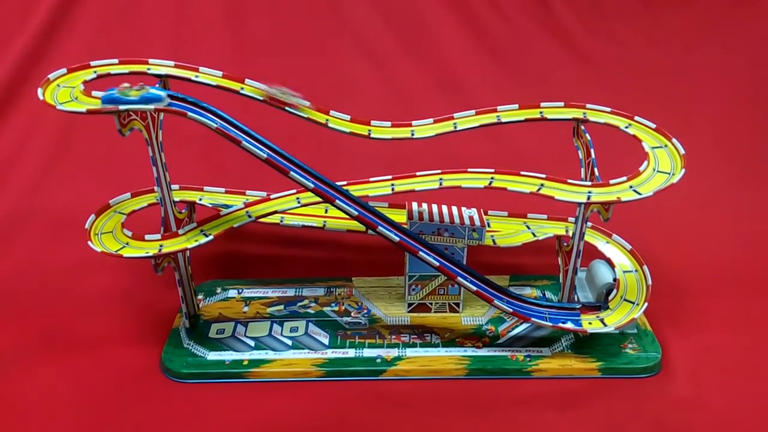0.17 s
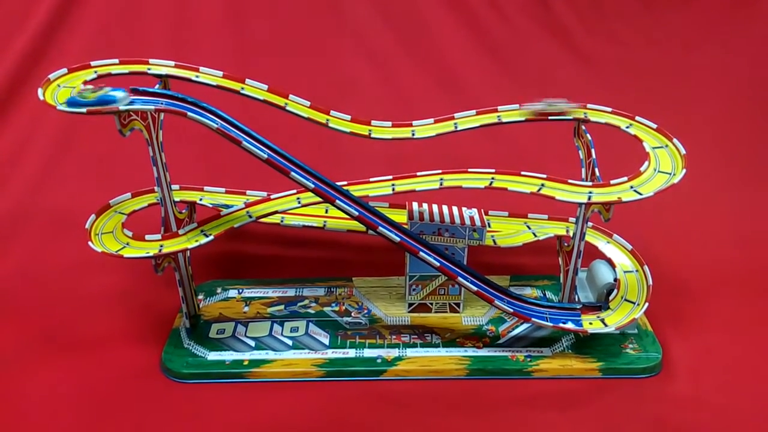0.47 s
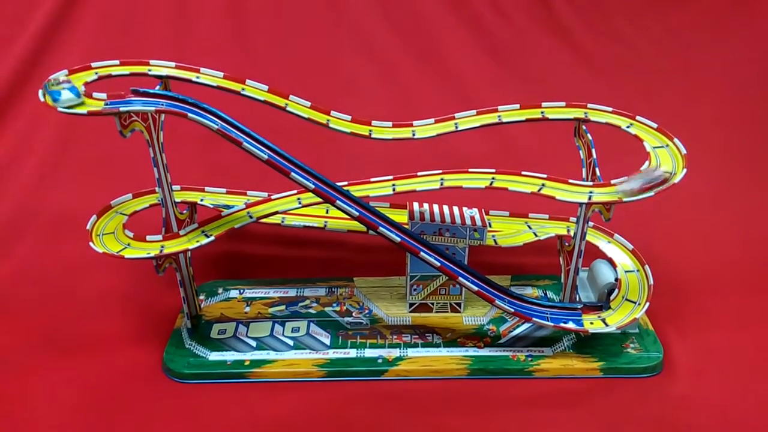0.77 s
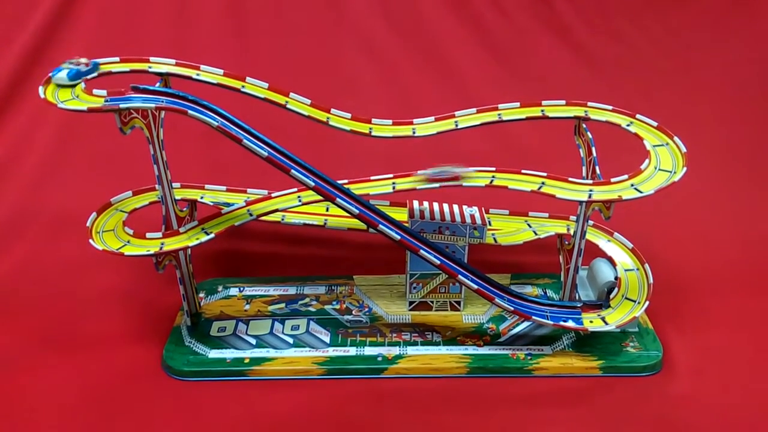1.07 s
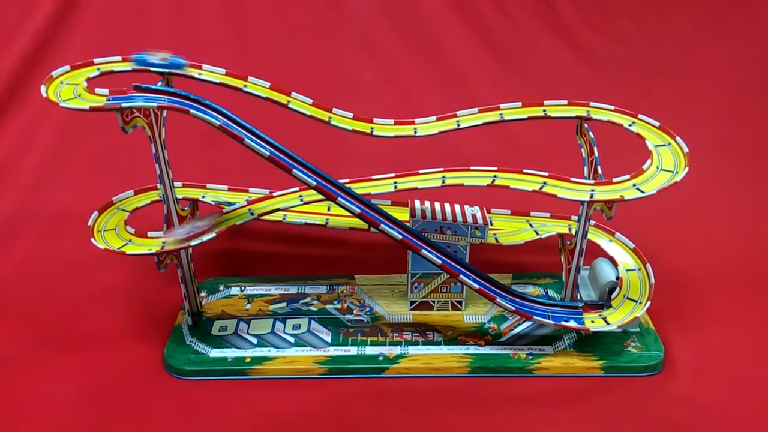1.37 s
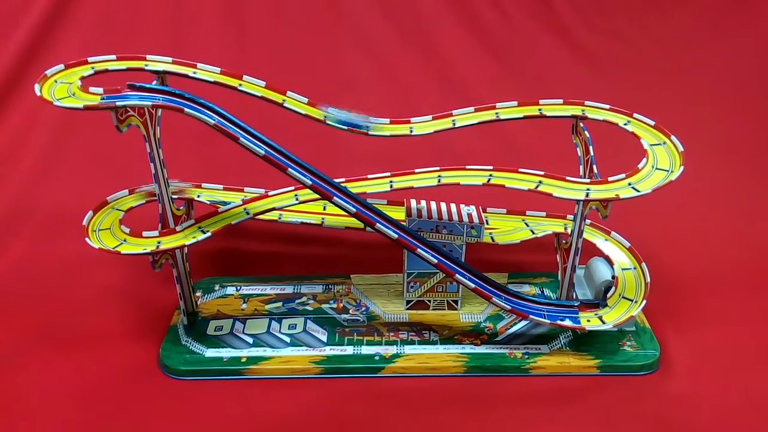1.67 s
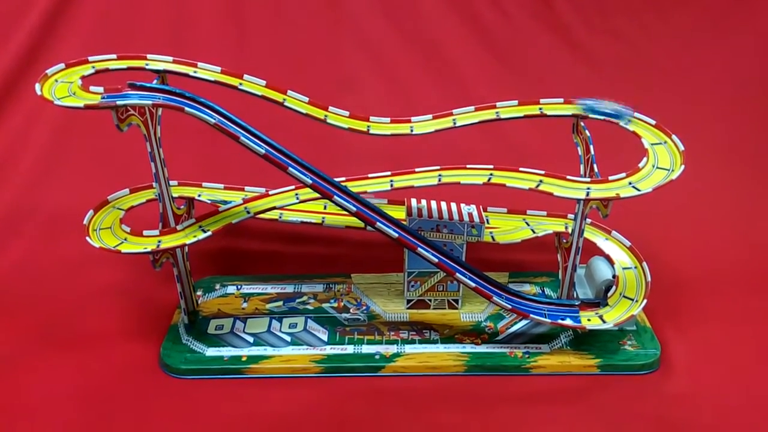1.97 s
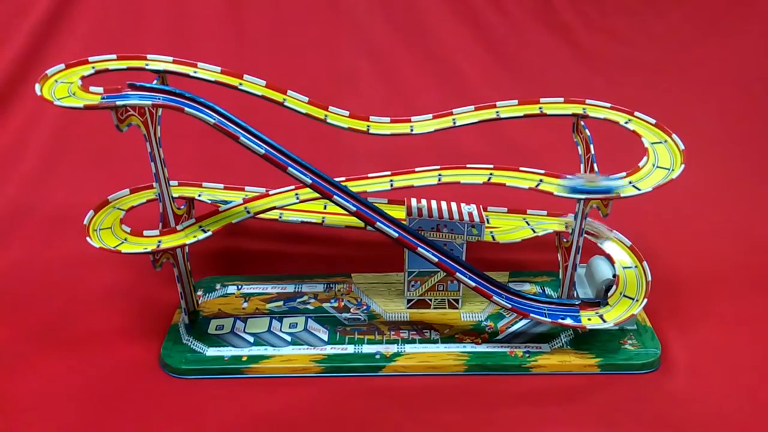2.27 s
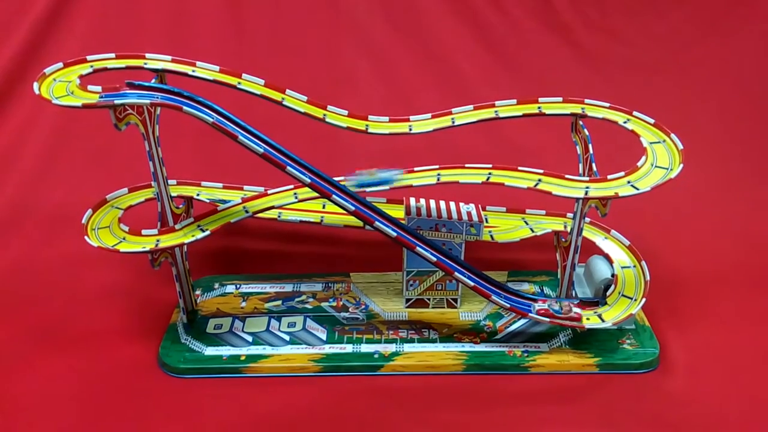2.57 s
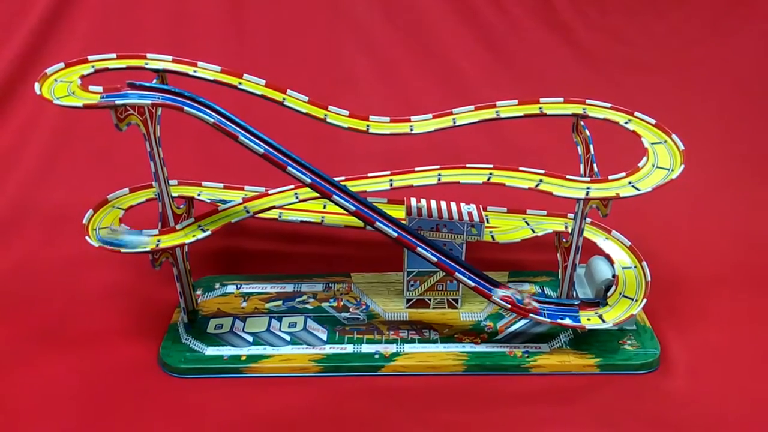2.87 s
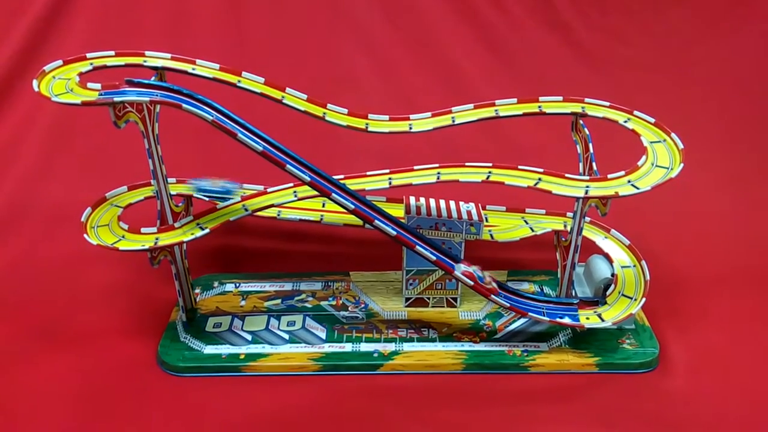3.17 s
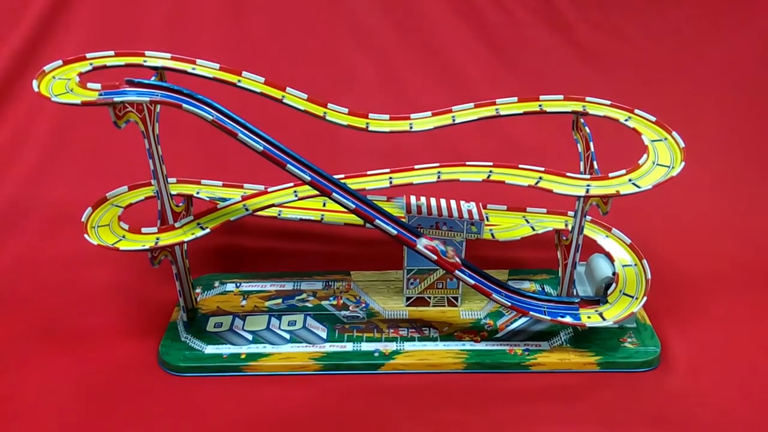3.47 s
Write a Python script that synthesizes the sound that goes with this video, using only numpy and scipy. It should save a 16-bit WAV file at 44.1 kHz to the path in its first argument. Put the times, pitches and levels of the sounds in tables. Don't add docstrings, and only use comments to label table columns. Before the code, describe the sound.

A battery-driven tin roller coaster whirs continuously, its gears chattering fast and bright with a quick flutter, while two small cars rattle over metal track joints; close microphone, quiet room, faint low rumble.

```python
import sys
import numpy as np
from scipy import signal
from scipy.fft import rfft, irfft, next_fast_len
from scipy.io import wavfile

SR = 44100
rng = np.random.default_rng(int(sys.argv[2]) if len(sys.argv) > 2 else 0)


def materialize(psi):
    bounded = np.clip(np.atleast_2d(psi).T, -1, 1)
    quanta = np.round(bounded * 32767).astype(np.int16)
    wavfile.write(sys.argv[1], SR, quanta)


def boost(x):
    u = np.asarray(x, float) / 20
    return 10 ** u


N = 159201
PAD = next_fast_len(N + SR)
HZ = np.arange(PAD // 2 + 1) * SR / PAD + 1e-3
TEETH = 5

# [t/s, turns]
TURNS = [(0, -.16), (.22, 9.72), (2.78, 127.65), (3.0, 137.28), (3.62, 164.05)]
BASE_HZ = [587, 728, 829, 963, 1038, 1147, 1228, 1470, 1571, 1785, 2108, 2165, 2346, 2456]
# [width/Hz, level over colour/dB]
BASE = [(18.1, 10.3), (8.8, 11.5), (18.1, 2), (12, 4.6), (9.1, 9), (18, 12.7), (51.4, 12.8), (15, 1.1),
        (14, 6), (35, 11.4), (22, 15.2), (31.3, 10.4), (19.7, 15.3), (20, 11)]
TRACK_HZ = [505, 1745, 2070, 2305, 3328, 3470, 3929, 4165, 4382, 4620, 5012, 5195, 5456, 4800]
# [width/Hz, level over colour/dB]
TRACK = [(40, 1), (25, -2.5), (30, 11.5), (18, 6), (45.4, 13), (90, 8.5), (30, 0), (14, 7.6), (39.2, 8),
         (90, 6.5), (35, 10), (70, 8), (40, 8), (40, 2)]


def rms_one(x):
    return x / np.sqrt(np.mean(x ** 2) + 1e-20)


def in_time(rows):
    return np.interp(np.arange(N) / SR, *np.transpose(rows))


def drift(rate_hz):
    r = np.exp(-2 * np.pi * rate_hz / SR)
    noise = rng.standard_normal(N + SR)
    return rms_one(signal.lfilter([1], [1, -2 * r, r * r], noise)[SR:])


def modes(hz, rows):
    return [(f, width, db) for f, (width, db) in zip(hz, rows)]


def minor_modes():
    count, level_db, width_hz = 160, 3.5, 49
    draw = rng.random((count, 2))
    return [(400 + 15000 * u ** 1.4, width_hz * (.5 + 2 * u), level_db * 2 * v) for u, v in draw]


def body(x, colour, peaks):
    power = np.ones(len(HZ))
    for hz, width, db in peaks:
        a, b = np.searchsorted(HZ, [hz - 12 * width, hz + 12 * width])
        distance = 2 * (HZ[a:b] - hz) / width
        power[a:b] += (boost(2 * db) - 1) / (1 + distance ** 2) ** 1.5
    points = np.array(colour)
    shape = boost(np.interp(np.log(HZ), np.log(points[:, 0]), points[:, 1], left=-70))
    cepstrum = irfft(np.log(shape * np.sqrt(power)), PAD)
    cepstrum[1:PAD // 2] *= 2
    cepstrum[PAD // 2 + 1:] = 0
    return irfft(rfft(x, PAD) * np.exp(rfft(cepstrum)), PAD)[:N]


def clicks(per_s, spread_db):
    sizes = boost(spread_db * np.minimum(rng.exponential(1, N), 5)) * rng.choice([-1, 1], N)
    return sizes * (rng.random(N) < per_s / SR)


def bursts(events, trim_db, rise_s, decay_s):
    s, db = np.transpose(events)
    starts = np.full(N, 1e-12)
    starts[(s * SR).astype(int)] = boost(db + trim_db)
    slow = np.exp(-1 / (decay_s * SR))
    fast = np.exp(-(1 / decay_s + 1 / rise_s) / SR)
    return signal.lfilter([1], [1, -slow], starts) - signal.lfilter([1], [1, -fast], starts)


def rattle(force, colour, peaks):
    per_s, spread_db = 8000.0, 2.0
    mode_db, swing_db, lump_db = 1.77, 1, 0.5
    out = 0
    for vary in rng.standard_normal((2, len(peaks))):
        own = [(hz, width, max(db + mode_db * v, 0)) for (hz, width, db), v in zip(peaks, vary)]
        share = boost(swing_db * drift(2.6) + lump_db * drift(21.0))
        hits = force * share * clicks(per_s, spread_db)
        out = out + body(hits, colour, own + minor_modes())
    return rms_one(out) * np.sqrt(np.mean(force ** 2))


def rumble():
    # [f/Hz, level per Hz/dB]
    rumble_colour = [(13, -44), (22, -3), (51, -2), (98, -3.5), (176, 0.5), (208, -6), (342, -15.5),
                     (416, -26.5), (500, -23), (650, -50), (1100, -120)]
    # [f/Hz, width/Hz, level over rumble/dB]
    hums = [(48, 8, 0), (84.5, 8, 2.5), (99, 18, 13), (129, 7.7, 10.5), (166, 8.9, 4), (235, 17, 5.5)]
    # [t/s, peak level/dB]
    bumps = [(0.033, -46), (0.315, -44), (0.405, -32), (0.75, -32), (0.908, -37), (1.358, -40), (1.6, -43),
             (1.82, -28), (1.892, -31), (2.136, -32), (2.496, -35), (2.804, -38), (2.95, -36), (3.191, -34),
             (3.429, -54)]
    tone_hz = 64 + 1.34 * drift(3.5)
    tone = np.sqrt(2) * np.sin(2 * np.pi * np.cumsum(tone_hz) / SR) * boost(-54 + 2.5 * drift(7.7))
    swell = 1 + bursts(bumps, trim_db=35, rise_s=0.008, decay_s=0.031)
    noise = body(rng.standard_normal(N), rumble_colour + [(1500, -55)], hums)
    return boost(-44.5) * rms_one(swell * noise) + tone


def room(x):
    t60_s, level_db, first_s = 0.31, -17, .004
    t = np.arange(SR // 2) / SR
    tail = rng.standard_normal(SR // 2) * boost(-60 * t / t60_s) * (t > first_s)
    return boost(level_db) * signal.fftconvolve(x, tail / np.sqrt(np.sum(tail ** 2)))[:N]


def thumps():
    # [t/s, peak level/dB]
    pushes = [(0.169, -41), (0.349, -46), (0.639, -45), (0.949, -46), (1.049, -37), (1.239, -39),
              (1.499, -42), (1.789, -33), (1.829, -50), (2.399, -57), (2.599, -40), (2.779, -37),
              (2.869, -38.5), (2.999, -39)]
    # [f/Hz, level per Hz/dB]
    thump_colour = [(40, -22), (90, -3), (200, 3.5), (350, -5.5), (550, -8), (1200, -33)]
    noise = rms_one(body(rng.standard_normal(N), thump_colour, []))
    return noise * bursts(pushes, trim_db=-3, rise_s=0.0063, decay_s=0.034)


def table_roll():
    # [t/s, level/dB]
    roll_level = [(0.0, -37), (0.01, -47.5), (0.22, -47.5), (0.38, -55.5), (0.52, -47), (0.58, -53),
                  (0.68, -45), (0.82, -52.5), (1.0, -48), (2.02, -48.5), (2.06, -45), (2.34, -51.5),
                  (2.37, -44), (3.15, -52), (3.58, -44), (3.6, -51)]
    # [f/Hz, level per Hz/dB]
    roll_colour = [(120, -15.5), (300, -4.5), (420, -9), (640, -7), (770, -8.5), (1000, -7), (1250, -1.5),
                   (2000, -24.5)]
    table_hz = [460, 505, 545, 587, 680, 728, 829, 875, 920, 963, 1038]
    # [width/Hz, level over colour/dB]
    table_rows = [(12, 11), (20, 12.8), (25, 11.8), (15, 11.7), (40, 3.3), (14, 11.4), (22, 14.5), (30, 13),
                  (20, 4.7), (12, 4.4), (16, 10)]
    return boost(0.5) * rattle(boost(in_time(roll_level)), roll_colour, modes(table_hz, table_rows))


def base_shake():
    # [t/s, level/dB]
    shake_level = [(0.0, -39), (0.15, -33), (1.44, -36), (1.45, -35), (1.48, -29.5), (1.72, -33.5),
                   (1.75, -32.5), (2.64, -31), (2.83, -35), (2.93, -31.5), (3.34, -33), (3.37, -28),
                   (3.42, -31), (3.6, -32)]
    # [f/Hz, level per Hz/dB]
    shake_colour = [(400, -27.5), (900, -15), (1300, -9), (1900, -5), (2250, 2), (2700, -12), (3500, -11),
                    (8000, -46.5)]
    # [t/s, peak level/dB]
    jolts = [(0.3376, -31), (0.5472, -27), (0.7512, -26), (0.9762, -27), (1.0286, -17), (1.0934, -27),
             (1.267, -27), (1.3289, -28), (1.3972, -22), (1.482, -32), (1.5658, -32), (1.6876, -21),
             (1.8223, -39), (1.8594, -21), (1.9425, -21), (2.0213, -29), (2.0936, -27), (2.1789, -38),
             (2.2109, -42), (2.383, -15), (2.591, -21), (2.66, -19), (2.9801, -25), (3.0215, -20),
             (3.0644, -26), (3.237, -35), (3.3792, -22), (3.4311, -29), (3.467, -20), (3.5104, -34)]
    shake_db = in_time(shake_level) - 1.5 * np.cos(2 * np.pi * TEETH * in_time(TURNS))
    force = boost(shake_db) + bursts(jolts, trim_db=-10.5, rise_s=0.00092, decay_s=0.0067)
    return boost(-2) * rattle(force, shake_colour, modes(BASE_HZ, BASE) + modes(TRACK_HZ, TRACK))


def cars():
    # [t/s, level/dB]
    car_level = [(0.0, -27.5), (0.07, -24.5), (0.66, -23), (0.73, -25.5), (1.46, -25.5), (1.48, -21.5),
                 (1.65, -28), (1.79, -23), (2.04, -26), (2.05, -20), (2.14, -25.5), (2.39, -23),
                 (2.57, -26.5), (2.59, -23), (2.88, -26.5), (2.9, -22), (3.14, -28), (3.6, -24.5)]
    # [t/s, peak level/dB]
    joints = [(0.2094, -37), (0.6265, -6), (0.8315, -22), (1.0904, -14.5), (1.4805, -8), (1.5194, -7),
              (1.938, -2), (2.0537, -22), (2.156, -13), (2.3301, -20), (2.5885, -13), (2.8994, -18),
              (2.9394, -9), (3.3594, -13)]
    # [f/Hz, level per Hz/dB]
    car_colour = [(900, -52), (2200, -14.5), (3000, -15.5), (3500, -9), (4400, 0.5), (5500, -4.5),
                  (8000, -14), (15000, -31)]
    knocks = bursts(joints, trim_db=-28.5, rise_s=0.0018, decay_s=0.067)
    return boost(-1.5) * rattle(boost(in_time(car_level)) + knocks, car_colour, modes(TRACK_HZ, TRACK))


def gears():
    # [t/s, level/dB]
    gear_level = [(0.0, -20), (0.02, -17.5), (0.05, -18), (0.68, -17), (0.77, -17.5), (2.94, -17),
                  (3.3, -19), (3.39, -17.5), (3.51, -19), (3.6, -18)]
    # [f/Hz, level per Hz/dB]
    gear_colour = [(700, -48), (1500, -27.5), (2900, -29), (5500, -17.5), (7000, -4), (8500, -12.5),
                   (12000, -21), (15700, -34)]
    # [t/s, peak level/dB]
    slaps = [(0.0194, -7), (0.1321, -15), (0.2698, -6), (0.3272, -7), (0.3516, -6), (0.3726, -15),
             (0.4204, 3), (0.528, 8), (0.5706, -10), (0.5916, 0), (0.634, -9), (0.6764, -12), (0.6998, -14),
             (0.7422, -14), (1.0445, -16), (1.068, -2), (1.1785, 4.5), (1.3284, -3), (1.479, -11),
             (1.5035, 1.5), (1.5683, -2), (1.6746, -22), (1.7185, -8), (1.7848, -4), (1.9395, -2),
             (1.9845, 2), (2.0507, -5), (2.1335, 0), (2.2618, -13), (2.2852, -7), (2.3062, -9),
             (2.3316, -5), (2.3516, -3), (2.4848, -12), (2.5022, -8), (2.5506, 3), (2.6224, 1), (2.6843, 5),
             (2.7192, -9), (2.7457, -8), (2.7641, -12), (2.811, -7), (2.8524, -2), (2.8774, -14),
             (2.896, 2), (2.9228, 3), (3.0131, -15), (3.0345, -2), (3.1033, -7), (3.1707, -1), (3.3363, -4),
             (3.3578, 3), (3.3872, -10), (3.4072, 2), (3.4775, -11), (3.5443, -9)]
    housing_hz = [5786, 5972, 6210, 6500, 6770, 6980, 7200, 7525, 7770, 9520, 10210, 10980, 12000, 13800]
    # [width/Hz, level over colour/dB]
    housing_rows = [(22, -16), (40, 11.5), (80, 0), (80, 3.3), (89.5, 8), (120, 4.5), (190, 8), (100, 7),
                    (100, 6), (60, 10), (110, 7.5), (65, 4.5), (50, 4), (100, -17)]
    # [f/Hz, level per Hz/dB]
    brush_colour = [(4000, -30), (8000, 2.5), (10000, -2.5), (13000, -0.5), (15700, -5.5)]
    gear_db = in_time(gear_level)
    angle = 2 * np.pi * in_time(TURNS) + .6
    swing_db = 1.56 * np.cos(angle) + 0.5 * np.cos(2 * angle + 0.66)
    swing_db = swing_db + .35 * np.cos(TEETH * angle) + .35 * drift(11.0)
    chatter = clicks(per_s=18000.0, spread_db=0.97) * boost(swing_db + gear_db)

    cover = signal.butter(2, [6200, 8270], "band", fs=SR, output="sos")
    slap_gain = bursts(slaps, trim_db=4, rise_s=0.001, decay_s=0.0042)
    chatter = chatter + signal.sosfilt(cover, chatter * slap_gain)

    housing = modes(housing_hz, housing_rows) + minor_modes()
    ringing = body(chatter, gear_colour, housing + modes(BASE_HZ, BASE))
    level = np.sqrt(np.mean(boost(2 * gear_db)))
    brush_db = 2.2 * np.cos(angle) + 0.54 * gear_db
    hiss = body(rng.standard_normal(N) * boost(brush_db), brush_colour, housing)
    return level * rms_one(ringing) + boost(-31.5) * rms_one(hiss)


def scene():
    toy = gears() + cars() + base_shake() + table_roll()
    return (toy + room(toy) + rumble() + thumps())[None]


def band_limit(x):
    return signal.sosfilt(signal.butter(12, 16750, fs=SR, output="sos"), x)


def record(dry):
    low = signal.butter(4, 38.0, "high", fs=SR, output="sos")
    top = signal.ellip(16, .3, 66, 15725, fs=SR, output="sos")
    mix = signal.sosfilt(np.vstack([low, top]), dry)
    return band_limit(mix)


dry = scene()
out = record(dry)
materialize(out)
```